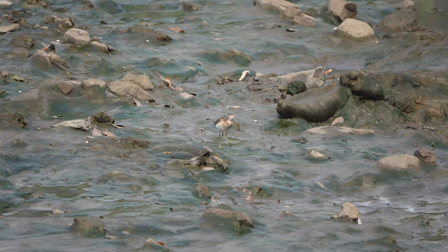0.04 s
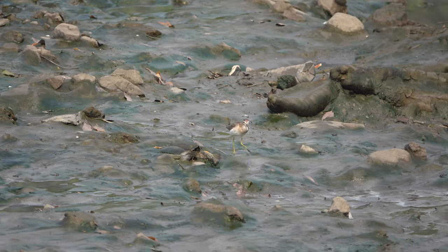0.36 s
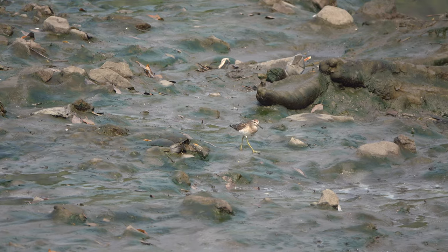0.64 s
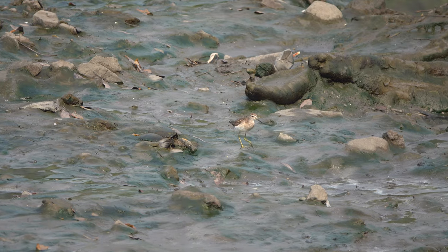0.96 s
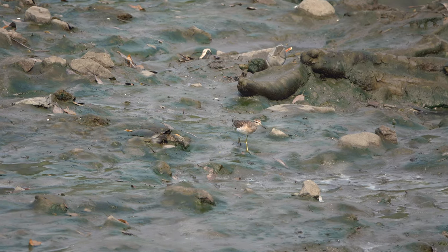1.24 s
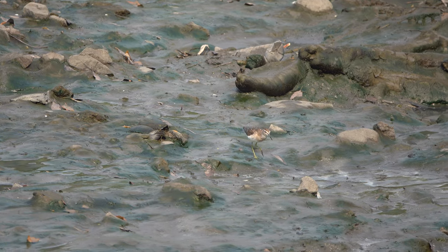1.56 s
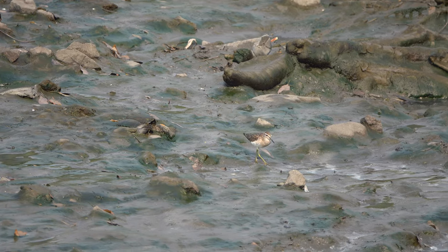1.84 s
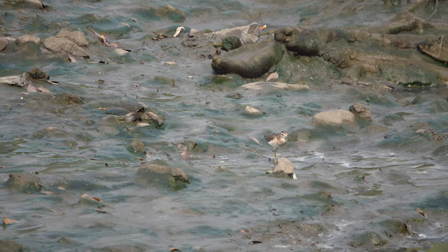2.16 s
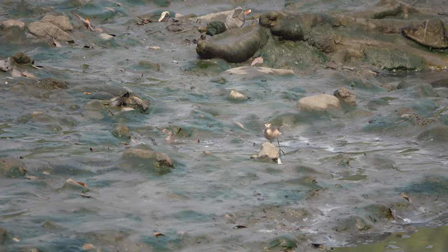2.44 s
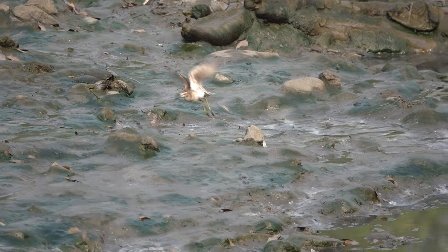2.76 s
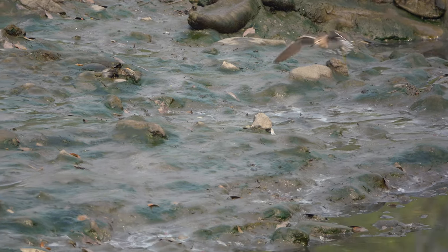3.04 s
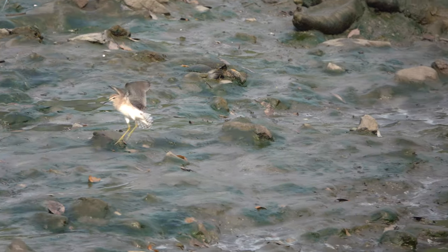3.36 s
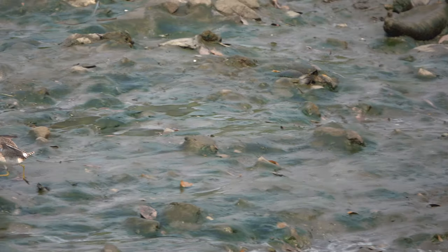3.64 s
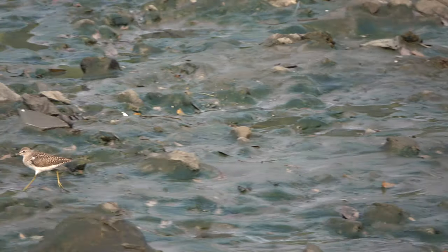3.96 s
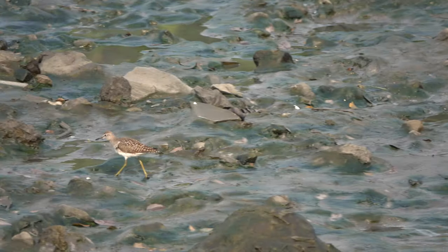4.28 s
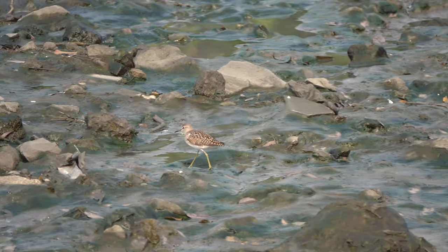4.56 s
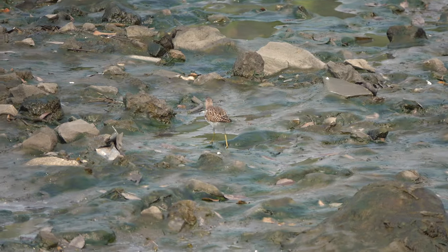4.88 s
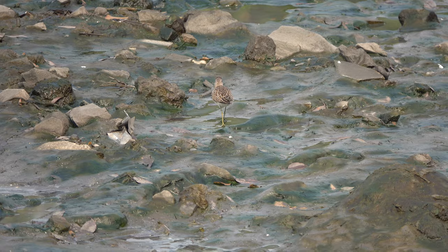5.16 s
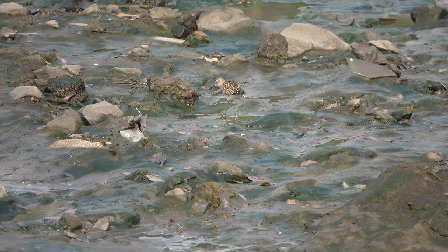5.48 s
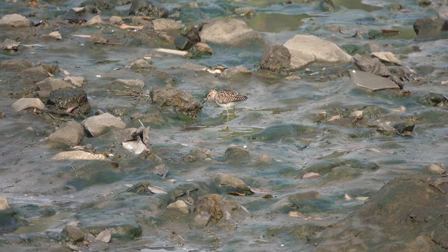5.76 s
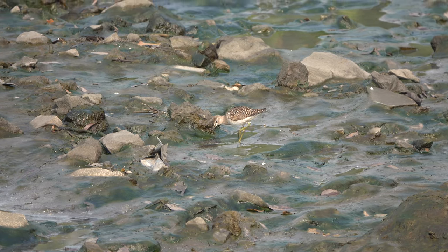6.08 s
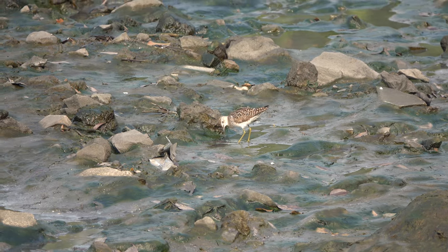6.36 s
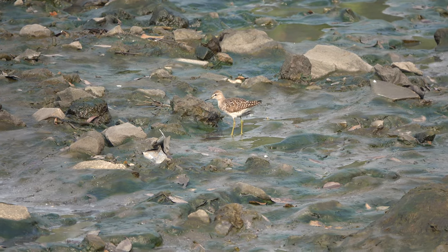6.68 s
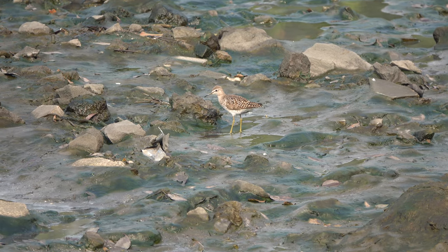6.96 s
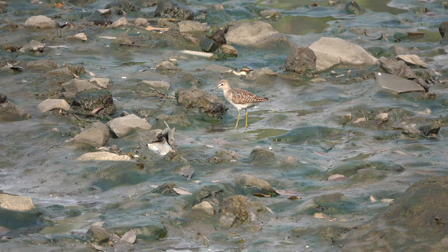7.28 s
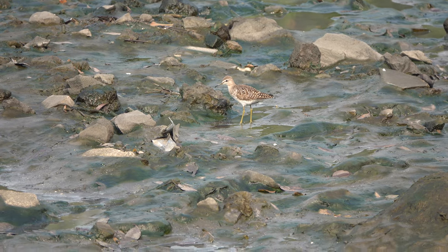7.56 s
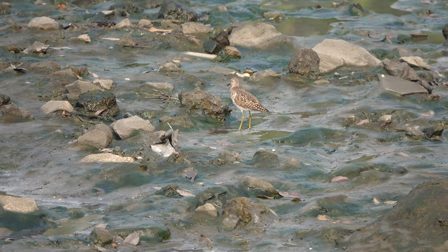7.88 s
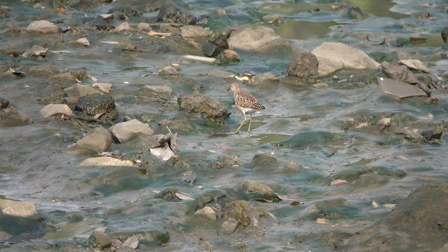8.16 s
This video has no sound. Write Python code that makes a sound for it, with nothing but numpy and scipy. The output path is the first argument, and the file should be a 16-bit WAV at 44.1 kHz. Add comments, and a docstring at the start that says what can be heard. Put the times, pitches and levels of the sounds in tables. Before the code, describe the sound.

Sandpipers whistle and chip in two bouts on a stony mudflat, with a larger wader piping further off over a steady rumble and hiss.

```python
"""A stony mudflat, heard through a small stereo microphone. Small sandpipers call in two bouts, a little
to the left: thin rising whistles, low slurs, short pips and sharp falling chips, each a near sine from
the syrinx. Further off a larger wader pipes, with hoarser birds far down the shore. The draining mud
fizzes with tiny bubbles; there are a few wet ticks and one brief, soft rustle, perhaps of wings.
Stones and bank scatter every call, over a steady distant rumble and a soft hiss."""
import sys
import numpy as np
from scipy import signal
from scipy.fft import rfft, irfft
from scipy.io import wavfile
from scipy.ndimage import uniform_filter1d

SR = 44100
rng = np.random.default_rng(int(sys.argv[2]) if len(sys.argv) > 2 else 0)


def bounce(signal):
    """Save signal as a 16-bit WAV file at the path given by the first command-line argument."""
    frames = np.transpose(np.atleast_2d(signal))
    limited = np.clip(frames, -1, 1)
    pcm = np.round(limited * 32767).astype(np.int16)
    wavfile.write(sys.argv[1], SR, pcm)


N = 371322
TIME = np.arange(N) / SR
FREQ = np.fft.rfftfreq(N, 1 / SR)

# colour of the distant rumble and of the hiss: (frequency [Hz], relative density [dB])
RUMBLE_COLOUR = [(15, -60), (25, -35.5), (79, -13.5), (119, -19), (168, -18.5), (283, -13), (401, -9.5),
                 (556, -7), (636, -8.5), (701, -6.5), (850, -2), (1430, 0), (2020, -4), (2500, -15),
                 (3250, -42), (5500, -120)]
HISS_COLOUR = [(1470, -34), (2500, -6), (2870, -3), (3190, 0.5), (3840, -8), (4270, -4.5), (6110, -17),
               (7000, -19), (8000, -16), (8690, -20), (12500, -22), (14500, -26.5), (15500, -30)]
# small level changes of the rumble and the hiss: (time [s], relative level [dB])
RUMBLE_SWELL = [(0.1, -47), (0.19, -47.5), (1.39, -47), (3.52, -47.5), (4.84, -46.5), (4.95, -48.5),
                (5.81, -47), (5.88, -44.5), (5.92, -48), (5.99, -46.5), (7.33, -48.5), (8.4, -47)]
HISS_DRIFT = [(0, -54.5), (.9, -56), (1.6, -54.5), (3, -55.5), (5, -56), (6.6, -53.5), (8.4, -54.5)]
# uneven, sometimes sudden swells near 1.8 kHz, perhaps distant birds: (time [s], relative level [dB])
BAND_SWELLS = [(0.1, -50), (1.01, -47), (1.05, -60), (1.29, -45), (1.87, -62.5), (2.13, -45.5), (2.71, -59),
               (3.12, -49.5), (3.46, -58), (3.74, -52), (4.0, -60), (4.41, -51), (4.56, -57), (4.84, -54),
               (4.86, -58), (5.14, -59), (5.16, -52), (6.01, -51.5), (6.28, -59), (6.8, -50.5)]
# likeness of the background on the two channels: (frequency [Hz], correlation [0-1])
STEREO_LIKENESS = [(60, .9995), (110, .997), (200, .975), (400, .93), (1300, .89), (2400, .75), (4400, .5),
                   (8000, .27), (14000, .67)]
# the left channel's lead in the background: (frequency [Hz], phase [rad])
LEFT_LEAD = [(700, 0), (1300, -.08), (2300, .6), (3100, .3), (4100, .6), (6000, 1.4), (8000, 0),
             (14000, -.1)]
# balance of the background: (frequency [Hz], left minus right [dB])
LEFT_TILT = [(60, -1.5), (110, -1), (200, -0.5), (380, 0), (700, 2), (1290, 2.5), (2380, -2), (4400, 0.0),
             (8120, -2.5), (15000, 3.5)]

# note gestures: (share of the note [0-1], pitch [ratio to the note's own], relative level [dB])
RISE_SHAPE = [(0, .912, -10), (.3, .94, -5), (.6, .966, -3), (.82, .983, -.5), (.94, 1.003, -2),
              (1, 1.035, -8)]
SLUR_SHAPE = [(0, 1.2, -10), (.12, 1.04, -0.5), (.24, .965, -5.5), (.35, 1.02, -5), (.55, 1.015, -3.5),
              (.82, .98, -2), (1, .94, -1)]
CHIP_SHAPE = [(0, 1.29, -24), (.1, 1.26, -20), (.2, 1.04, -22), (.3, .92, -24), (.44, 1, -17),
              (.57, 1.008, -3), (.7, 1, 0), (.82, .92, -3), (.91, .82, -3), (1, .69, -7)]
RASP_SHAPE = [(0, 1.29, -12), (.1, 1.27, 1), (.19, 1.1, 0), (.29, .9, 4), (.4, .95, -1), (.5, .98, -5),
              (.62, 1.1, -27), (1, 1.1, -60)]
PIP_SHAPE = [(0, 1.005, 1), (.35, 1.01, -5.5), (.7, 1, -2), (1, .975, -10)]
LILT_SHAPE = [(0, .965, -6.5), (.35, .98, -2.5), (.72, 1.005, 3), (1, 1.01, -6)]
PIPE_SHAPE = [(0, 1.055, -6), (.06, 1.047, -1.5), (.2, 1.01, 1), (.42, .988, -3.5), (.68, .974, 0),
              (.74, .965, -11), (1, .955, -11)]

# short pips among the stones: (time [s], pitch [Hz], level [dB])
PIP_CALLS = [(.06, 4700, -50), (.195, 4640, -52), (2.058, 4740, -44.5), (2.312, 4670, -45.5),
             (5.515, 4770, -40), (5.861, 4750, -43), (6.316, 4030, -51), (7.162, 4020, -48),
             (7.697, 4930, -54), (8.197, 4900, -49), (8.273, 4850, -50), (8.303, 4750, -46)]
# the same bird's low slurs and sharp chips: (time [s], level [dB])
SLUR_CALLS = [(1.326, -44.5), (1.618, -44), (1.924, -46), (2.221, -44.5), (2.551, -44), (5.309, -47),
              (5.426, -45.5), (5.572, -47), (5.775, -43), (5.842, -45), (6.015, -52), (8.219, -43.5)]
CHIP_CALLS = [(1.435, -44), (1.703, -44), (1.973, -46.5), (2.226, -45.5), (2.62, -45.5), (5.28, -49),
              (6.351, -44.5), (6.63, -41.5), (6.916, -39.5), (7.194, -39), (7.466, -41), (7.827, -40)]
# its stance: (time [s], how openly it faces the microphone [dB], harshness [dB])
BIRD_STANCE = [(1.3, -1.5, .5), (2.7, -2, .5), (5.3, -4.5, -1), (6, -4.5, -1), (6.5, -.5, -4),
               (7.95, -.5, -4), (8.2, -5, -1)]
# rising whistles in the open: (time [s], pitch near the top [Hz], level [dB])
RISE_CALLS = [(.68, 4730, -60), (.863, 4660, -51.5), (1.06, 4850, -50), (1.246, 4920, -49),
              (5.19, 5000, -49.5), (5.387, 5080, -47), (5.576, 5100, -46), (5.761, 5130, -45.5),
              (5.947, 5030, -48), (6.124, 4750, -51.5)]
# birds far down the shore: (time [s], pitch [Hz], level [dB])
SHORE_CALLS = [(1.39, 7100, -63), (1.47, 6700, -66), (1.8, 2640, -54), (5.3, 2590, -48.5),
               (5.37, 2560, -50.5), (5.47, 2600, -50), (5.77, 1880, -51), (5.94, 1850, -49),
               (6.01, 2590, -56), (6.06, 3470, -53), (6.17, 3010, -51), (6.55, 3000, -46),
               (6.61, 3510, -45.5), (6.73, 2700, -44), (6.77, 2375, -43), (6.84, 4270, -50),
               (6.88, 2740, -44), (7.33, 2580, -50)]
# the larger wader's short notes and long falling whistle: (time [s], length [s], pitch [Hz], level [dB])
LILT_CALLS = [(6.623, 0.028, 3560, -44), (6.711, 0.023, 2790, -39.5), (6.788, 0.024, 2680, -46.5),
              (6.873, 0.018, 2860, -42.5), (7.83, 0.078, 2010, -44.5), (7.925, .03, 1960, -42.5),
              (8.085, 0.069, 2055, -40.5), (8.166, 0.033, 2036, -41), (8.245, 0.03, 2030, -51),
              (8.305, 0.085, 2107, -38), (8.395, .035, 2080, -41)]
PIPE_CALLS = [(6.856, .265, 2074, -33.5)]
# wet ticks and, at 3.792 s, one soft rustle, perhaps of wings:
# (time [s], pitch [Hz], bandwidth [Hz], decay [s], level [dB])
TICKS_AND_RUSTLE = [(2.136, 9400, 1200, .004, -52), (2.612, 10500, 5500, .005, -46.5),
                    (2.629, 8500, 5500, .0035, -46), (2.772, 3000, 1500, 0.0042, -41),
                    (2.781, 3670, 1500, .003, -43), (3.792, 6960, 1800, .022, -58),
                    (5.3, 5900, 1000, .009, -53)]


def undb(db):
    """Decibels to gain."""
    return 10 ** (np.asarray(db) / 20)


def unit(x):
    """Scale to rms 1."""
    return x / np.sqrt(np.mean(x ** 2))


def across(points):
    """(frequency [Hz], value) points joined on a log-frequency axis."""
    hz, value = np.transpose(points)
    return np.interp(np.log(FREQ + 1), np.log(hz), value)


def walk(rate, size=N):
    """Smooth random wander with a spread near 1."""
    k = max(int(SR / rate), 1)
    held = np.repeat(rng.standard_normal(size // k + 1), k)
    return 1.334 * uniform_filter1d(uniform_filter1d(held, k), k)[:size]


def band(x, hz, width_hz):
    """Keep a bell-shaped band around hz."""
    return irfft(rfft(x) * np.exp(-.5 * ((FREQ - hz) / width_hz) ** 2), N)


def add(track, s, sound):
    """Mix a sound into a track at time s."""
    i = int(np.clip(s * SR, 0, N - 1))
    track[i:i + len(sound)] += sound[:N - i]


def air(colour):
    """Diffuse noise at the microphone: alike on both sides in the bass, wider in the treble."""
    likeness = np.clip(across(STEREO_LIKENESS), 0, 1)
    mid, side = rfft(rng.standard_normal((2, N))) * undb(across(colour))
    signs = np.array([[1], [-1]])
    pair = mid * np.sqrt(1 + likeness) + signs * side * np.sqrt(1 - likeness)
    balance = undb(signs * across(LEFT_TILT) / 2)
    lead = np.exp(.5j * signs * across(LEFT_LEAD))
    return unit(irfft(pair * balance * lead, N))


def distant_rumble(gain_db=2.1, flicker_db=.84, band_rest_db=-55, band_depth=.5):
    """A far-off rumble with uneven, sometimes sudden swells near 1.8 kHz, perhaps distant birds."""
    swell_db = np.interp(TIME, *np.transpose(RUMBLE_SWELL))
    band_db = np.interp(TIME, *np.transpose(BAND_SWELLS), right=band_rest_db) - band_rest_db
    rumble = air(RUMBLE_COLOUR)
    rumble += band(rumble, hz=1800, width_hz=260) * (undb(band_depth * band_db) - 1)
    return rumble * undb(swell_db + gain_db + flicker_db * walk(14))


def hum():
    """Two faint, wavering low tones, dead centre."""
    return sum(undb(db + 2.7 * walk(7.2)) * np.sin(2 * np.pi * np.cumsum(hz + 4 * walk(25)) / SR)
               for hz, db in [(92, -85), (285, -75)])


def shore_hiss():
    """The soft, nearly even hiss of the shore."""
    return air(HISS_COLOUR) * undb(np.interp(TIME, *np.transpose(HISS_DRIFT)) + .85 * walk(6))


def sing(notes, gesture, waver, flutter_db, octave_db, edge_s=.003):
    """A syrinx whistles each note as a near sine that follows the gesture, never twice quite alike."""
    track = np.zeros(N)
    share, ratio, shape_db = np.transpose(gesture)
    for s, length, hz, db, *sweep in notes:  # an optional exponent scales the pitch sweep
        n = int(length * SR)
        progress = np.linspace(0, 1, n)
        bend = uniform_filter1d(np.interp(progress, share, ratio), size=130) ** (sweep[0] if sweep else 1)
        pitch = hz * bend * (1 + waver * walk(300.4, size=16384)[:n])
        phase = 2 * np.pi * np.cumsum(pitch) / SR
        edges = np.clip(np.minimum(progress, 1 - progress) * length / edge_s, 0, 1)
        level_db = db + np.interp(progress, share, shape_db) + flutter_db * walk(182, size=16384)[:n]
        add(track, s, edges * undb(level_db) * (np.sin(phase) + undb(octave_db) * np.sin(2 * phase)))
    return track


def alike(calls, length_s, hz):
    """Notes of one length and pitch, from (time [s], level [dB]) rows."""
    return [(s, length_s, hz, db) for s, db in calls]


def lasting(calls, length_s):
    """Notes of one length, from (time [s], pitch [Hz], level [dB]) rows."""
    return [(s, length_s, hz, db) for s, hz, db in calls]


def hoarse(voice, hz, width_hz):
    """Noise that rides on a voice's loudness: the rough part of a harsh call."""
    loudness = np.sqrt(np.abs(uniform_filter1d(voice ** 2, size=200)))
    return loudness * unit(band(rng.standard_normal(N), hz, width_hz))


def place(x, left_db, lead_us):
    """Direct sound at the microphone: the left channel differs in level and leads in time."""
    taps = np.arange(-16, 17)
    late = np.convolve(x, np.sinc(taps - lead_us * SR / 10 ** 6) * np.hanning(len(taps)), "same")
    return np.array([x * undb(left_db / 2), late * undb(-left_db / 2)])


def scatter(x, t60, grain=1.0, late_t60=1.0, late_db=-14, build_s=.0021):
    """Many small echoes from nearby stones, then a long wash from the bank; different on each channel."""
    t = TIME[:SR]
    echoes = rng.standard_normal((2, SR)) * np.exp(grain * rng.standard_normal((2, SR)))
    decay = undb(-60 * t / t60) + undb(late_db - 60 * t / late_t60)
    echoes *= decay * (1 - np.exp(-t / build_s))
    echoes /= np.sqrt(np.sum(echoes ** 2, axis=1, keepdims=True))
    return signal.fftconvolve(x[None], echoes, axes=1)[:, :N]


def chipping_bird():
    """Pips, slurs and chips that open with a rasp: the direct sound, and what is thrown at the stones."""
    times, facing, harshness = np.transpose(BIRD_STANCE)
    facing_db, harsh_db = np.interp(TIME, times, facing), np.interp(TIME, times, harshness)
    slur_notes = alike(SLUR_CALLS, length_s=.05, hz=3920)
    chip_notes = alike(CHIP_CALLS, length_s=.078, hz=4757)
    slurs = sing(slur_notes, SLUR_SHAPE, waver=.009, flutter_db=2, octave_db=-30)
    chips = sing(chip_notes, CHIP_SHAPE, waver=.009, flutter_db=2.2, octave_db=-32)
    pips = sing(lasting(PIP_CALLS, length_s=.026), PIP_SHAPE, waver=.016, flutter_db=2.5, octave_db=-28)
    rasps = sing(chip_notes, RASP_SHAPE, waver=.02, flutter_db=3, octave_db=-30) * undb(harsh_db - 5)
    rough = hoarse(slurs + chips + pips, hz=4150, width_hz=660) * undb(harsh_db - 1)
    direct = place(slurs, left_db=4.5, lead_us=33)
    direct += place(chips + pips + undb(-11) * rasps, left_db=3.8, lead_us=17)
    thrown = undb(-6) * slurs + undb(-4.5) * (chips + pips) + rasps + rough
    return direct * undb(facing_db), thrown  # turning away dims only the direct sound


def whistling_bird(length_s=.075, foot_hz=4520):
    """Thin whistles climb from one starting pitch, so the higher one ends the wider it sweeps."""
    foot_ratio = RISE_SHAPE[0][1]
    notes = [(s, length_s, hz, db, np.log(foot_hz / hz) / np.log(foot_ratio)) for s, hz, db in RISE_CALLS]
    return sing(notes, RISE_SHAPE, waver=.006, flutter_db=2, octave_db=-20)


def sandpipers():
    """The two nearest birds, left of centre: one whistles in the open, one chips among the stones."""
    rises = whistling_bird()
    direct, thrown = chipping_bird()
    echoes = scatter(undb(-10) * rises + thrown, t60=.36, grain=.6, late_t60=1.2, late_db=-12)
    return place(rises, left_db=1.5, lead_us=36) + direct + echoes * undb([[.8], [-.8]])


def mud_fizz(count=45, floor_db=-65, spread_db=4.5, ring_s=.001):
    """Draining mud crackles faintly: tiny bubbles burst at random."""
    track, t = np.zeros(N), TIME[:1024]
    for when, pitch, size in rng.random((count, 3)):
        ring = np.sin(2 * np.pi * (8000 + 6000 * pitch) * t) * t / ring_s * np.exp(-t / ring_s)
        level_db = floor_db + spread_db * min(-np.log(1 - size), 3)
        add(track, when * TIME[-1], ring * undb(level_db))
    return track + scatter(track, t60=.2)


def far_waders():
    """Clear piping across the flat; the furthest, hoarser birds arrive mostly as scattered sound."""
    whistle = sing(PIPE_CALLS, PIPE_SHAPE, waver=.001, flutter_db=-.8, octave_db=-38)
    lilts = sing(LILT_CALLS, LILT_SHAPE, waver=.005, flutter_db=2.5, octave_db=-26)
    far = sing(lasting(SHORE_CALLS, length_s=.0704), LILT_SHAPE, waver=.025, flutter_db=3, octave_db=-30)
    rough = hoarse(far, hz=2877, width_hz=490)
    thrown = undb(-12) * whistle + undb(-6) * lilts + far + undb(-10) * rough
    direct = place(whistle + lilts + undb(-8.5) * far, left_db=.5, lead_us=27)
    return direct + scatter(thrown, t60=.43, grain=.59, late_t60=1.0, late_db=-5)


def ticks_and_rustle(attack_s=.0012):
    """Noise bursts, louder on the right: wet ticks and one brief, soft rustle, perhaps of wings."""
    track, t = np.zeros(N), TIME[:4096]
    hz_axis = np.fft.rfftfreq(len(t), 1 / SR)
    for s, hz, width, decay, db in TICKS_AND_RUSTLE:
        burst = irfft(rfft(rng.standard_normal(len(t))) * np.exp(-2 * ((hz_axis - hz) / width) ** 2))
        envelope = (1 - np.exp(-t / attack_s)) * np.exp(-t / decay)
        add(track, s, undb(db) * unit(burst) * envelope)
    return place(track, left_db=-3, lead_us=5.5) + undb(-3) * scatter(track, t60=.27)


def scene():
    """Birds and mud over the shore's background, from one microphone position."""
    foreground = sandpipers() + far_waders() + ticks_and_rustle() + mud_fizz()
    return foreground + distant_rumble() + hum() + shore_hiss()


def record(dry, top_hz=15700):
    """The recorder opens with a short fade and cuts the top."""
    fade = np.clip((TIME - .036) / .018, 0, 1)
    return signal.sosfilt(signal.ellip(10, .1, 70, top_hz, fs=SR, output="sos"), dry * fade)


dry = scene()
out = record(dry)
bounce(out)
```